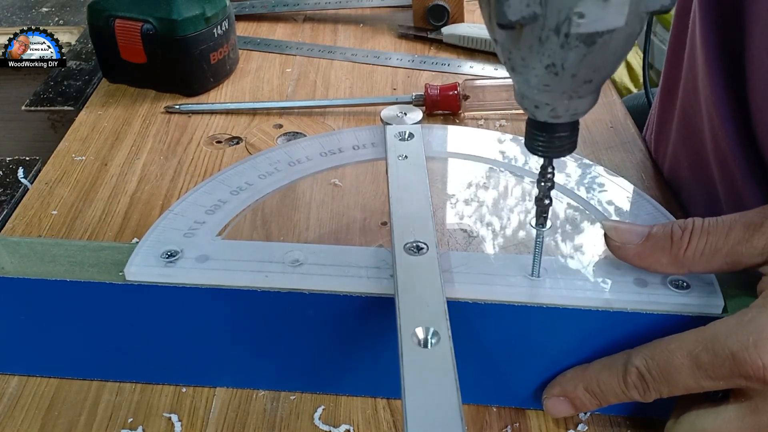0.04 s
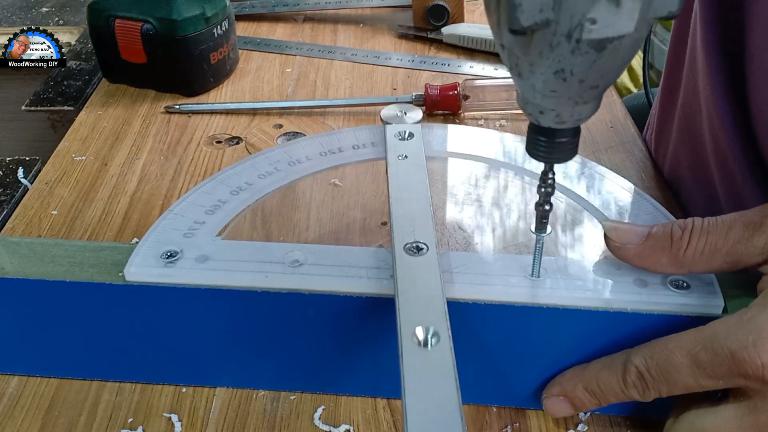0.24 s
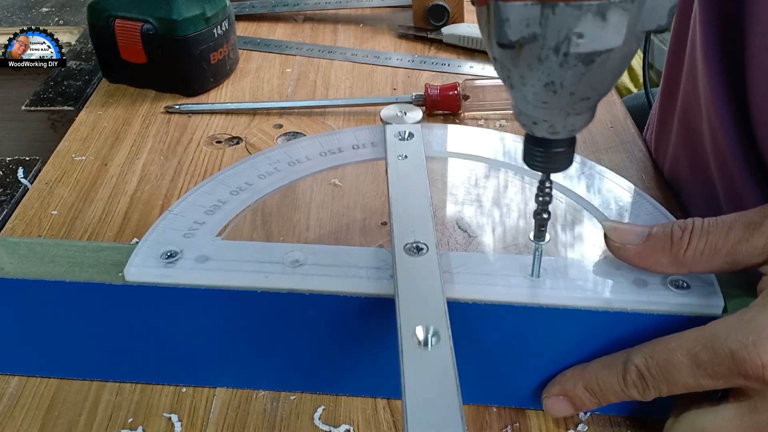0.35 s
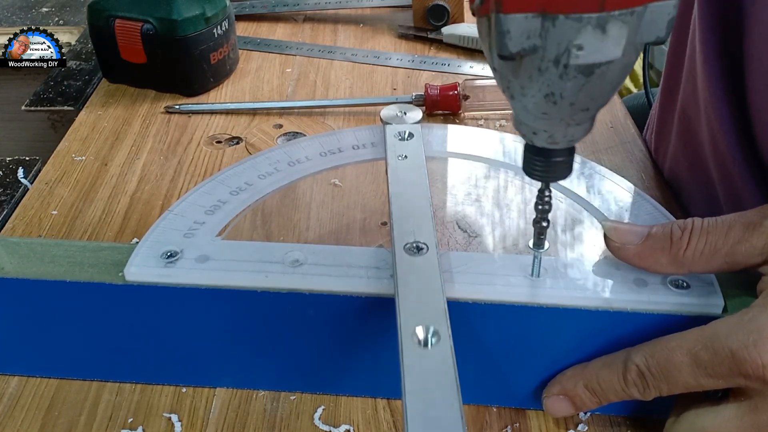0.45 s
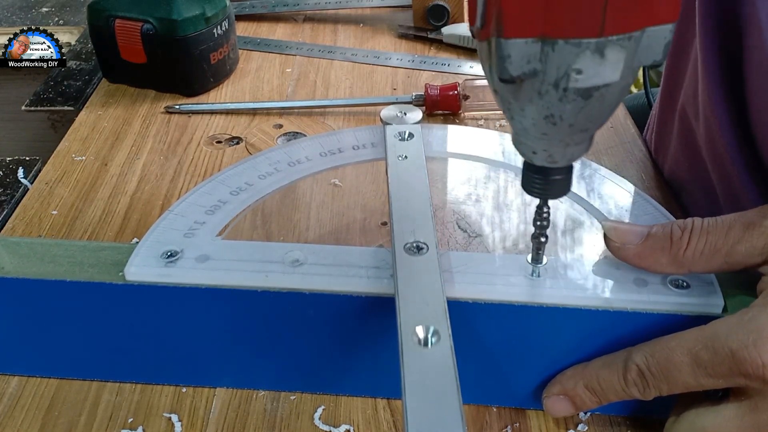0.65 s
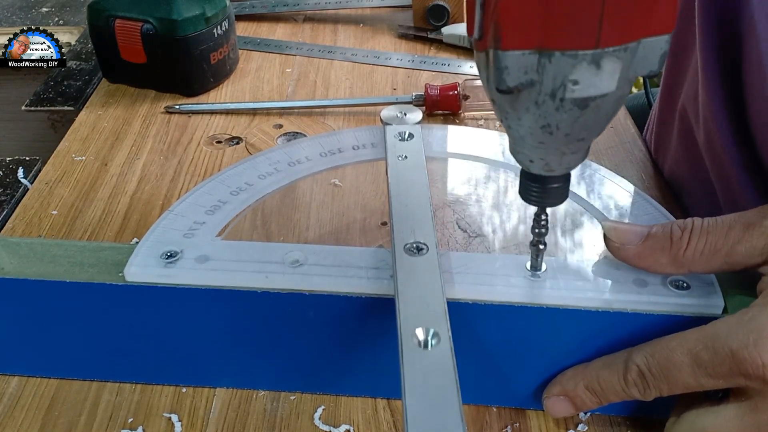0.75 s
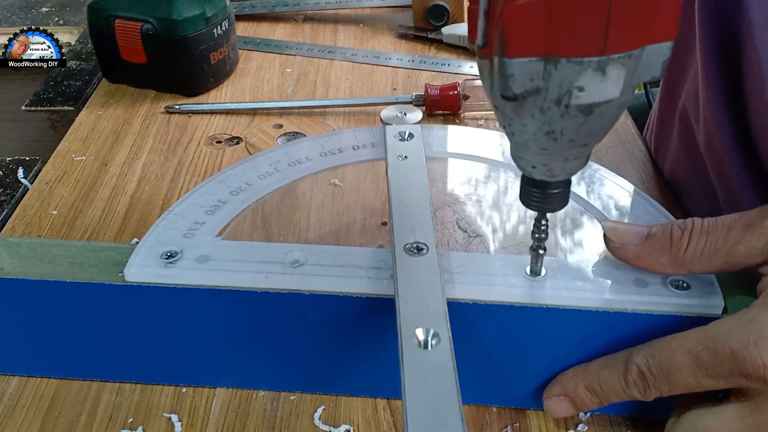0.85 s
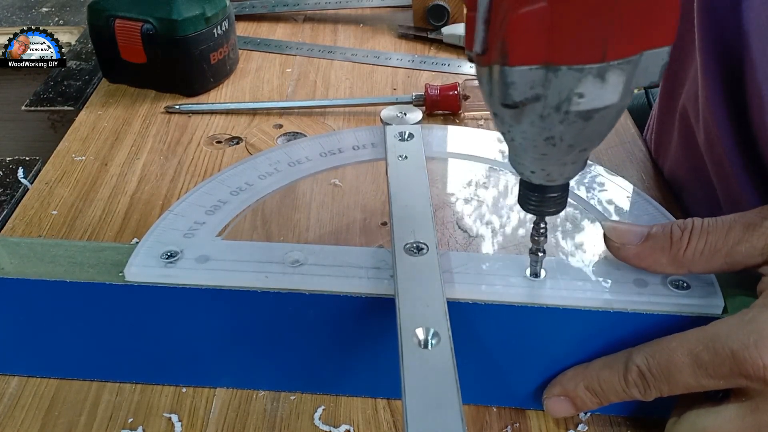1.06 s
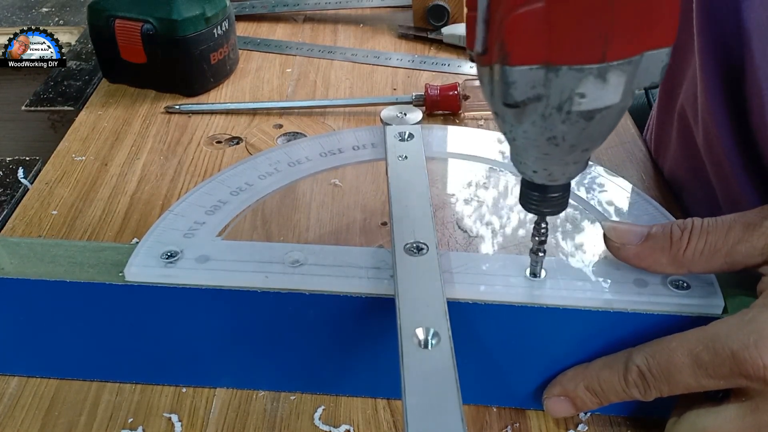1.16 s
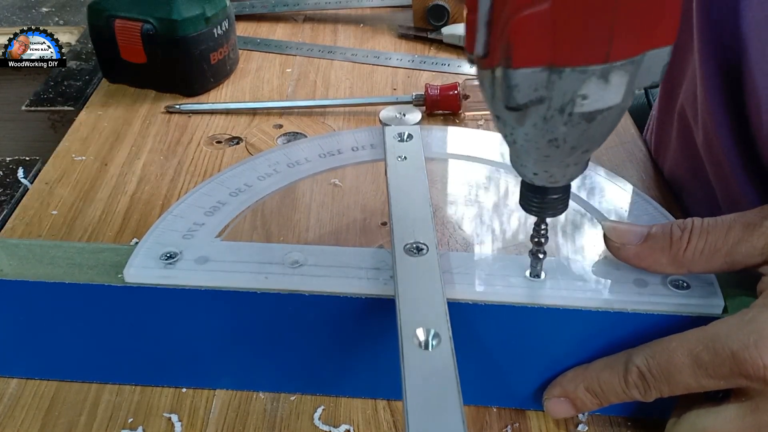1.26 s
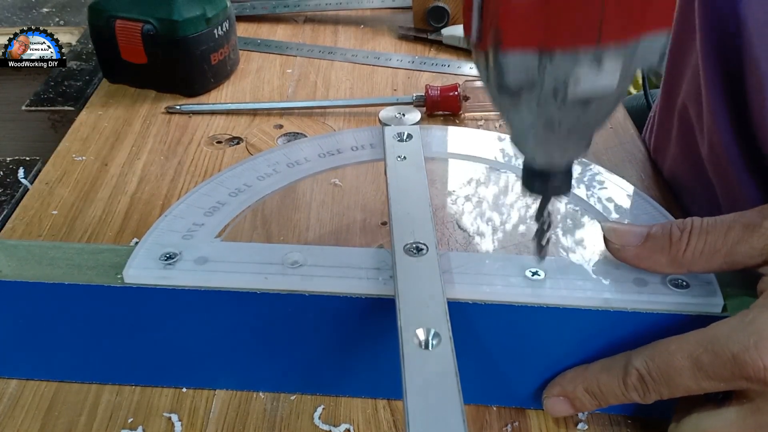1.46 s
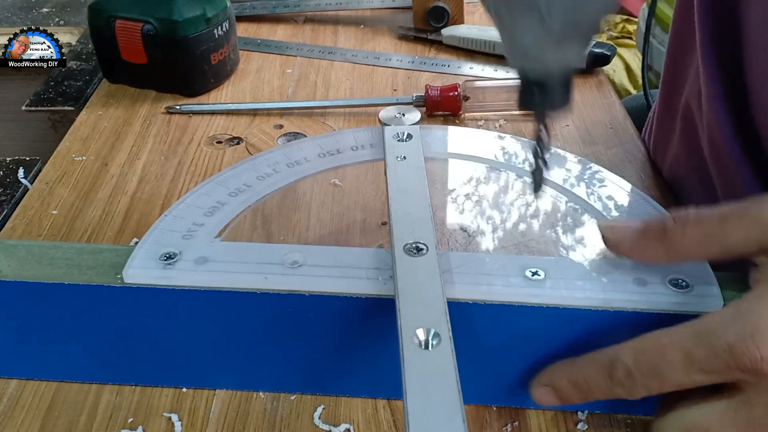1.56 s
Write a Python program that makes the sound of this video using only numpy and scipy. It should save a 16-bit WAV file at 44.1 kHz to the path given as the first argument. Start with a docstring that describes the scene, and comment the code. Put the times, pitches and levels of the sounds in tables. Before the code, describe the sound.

A cordless impact driver spins up close by with a rattling whine, slowing to a stall as a screw grinds into wood. A second, shorter burst hammers it tight with sharp knocks, over faint workshop background.

```python
"""Faint workshop background, then a cordless impact driver spins up close by, its gears rattling and whining.
It runs a screw through a plastic protractor, grinding into wood, and slows to a stall as the screw bites.
After a short nudge, a second burst seats the screw with hammer blows that thump the board,
while the tool's weight jolts the bench. The bit lifts off with a tick."""
import sys
import numpy as np
from scipy import signal
from scipy.fft import rfft, irfft
from scipy.io import wavfile

SR = 44100
rng = np.random.default_rng(int(sys.argv[2]) if len(sys.argv) > 2 else 0)


def transcribe(signal):
    """Save signal, clipped to [-1, 1], as a 16-bit WAV file at the path in sys.argv[1]."""
    frames = np.atleast_2d(signal).T
    limited = np.clip(frames, -1, 1)
    pcm = np.round(limited * 32767).astype(np.int16)
    wavfile.write(sys.argv[1], SR, pcm)


N = 70560
TIME_S = np.arange(N) / SR
BINS_HZ = np.fft.rfftfreq(N, 1 / SR)


def undb(db):
    """Decibels to gain."""
    return 10 ** (np.asarray(db) / 20)


def unit_rms(x):
    """Scale to rms 1."""
    return x / np.sqrt(np.mean(np.abs(x) ** 2))


def curve(rows):
    """Join (t/s, value) points linearly."""
    return np.interp(TIME_S, *np.array(rows).T)


def at_hz(rows, hz):
    """Read (f/Hz, value) points on a log-frequency axis."""
    points_hz, values = np.array(rows).T
    return np.interp(np.log(np.maximum(hz, 1)), np.log(points_hz), values)


def colour(x, rows):
    """Filter by (f/Hz, gain/dB) points."""
    return irfft(rfft(x) * undb(at_hz(rows, BINS_HZ)), N)


def treble(x, hz):
    """High-pass at hz."""
    return irfft(rfft(x) * (1 - 1 / (1 + (BINS_HZ / hz) ** 6)), N)


def wander(hz):
    """Smooth random signal, rms 1, bandwidth about hz."""
    return unit_rms(irfft(rfft(rng.standard_normal(N)) * np.exp(-(BINS_HZ / hz) ** 2), N))


# Stereo width: f/Hz, side minus mid/dB
WIDTH_DB = [(60, -11), (150, -20), (300, -30), (600, -3), (1200, -7), (2500, -2), (5000, 2), (14000, -1)]

def noise(rows):
    """Coloured stereo noise, rms 1: bass narrow, treble wide."""
    mid, side = rng.standard_normal((2, N))
    stereo = mid + colour(side, WIDTH_DB) * np.array([[1], [-1]])
    return unit_rms(colour(stereo, rows))


# Background spectrum: f/Hz, relative density/dB
BACKGROUND_SPECTRUM_DB = [(18, -56), (30, -26), (65, -11), (102, -5), (143, 1.5), (200, -7.5), (312, -6),
                          (552, -13), (837, -7), (978, -12.5), (2430, -9), (3320, -15), (5170, -10),
                          (8040, -33.5), (15000, -43)]
# Background envelope: t/s, level/dB
BACKGROUND_DB = [(0, -45.5), (.15, -46), (1.1, -51), (1.48, -51), (1.54, -53), (1.6, -69)]

def workshop_background():
    """Faint, low room noise."""
    return noise(BACKGROUND_SPECTRUM_DB) * undb(curve(BACKGROUND_DB))


# Motor speed: t/s, gear mesh f/Hz
MESH_HZ = [(.16, 119.1), (.19, 367.4), (.236, 872), (.265, 1245), (.3, 1376), (.34, 1511), (.42, 1579),
           (.48, 1543), (.56, 1523), (.66, 1484), (.742, 1435), (.78, 1231), (.82, 1047), (.86, 938),
           (.922, 887.6), (.96, 611.7), (1.0, 335), (1.03, 150), (1.13, 130.8), (1.17, 200), (1.22, 790),
           (1.3, 449.2), (1.4, 351.3), (1.47, 118.9)]

def motor():
    """Wavering drive: mesh rate, elapsed mesh cycles and the shaft's swing."""
    mesh_hz = curve(MESH_HZ) * (1 + 0.0039 * wander(29.45))
    mesh_cycles = np.cumsum(mesh_hz) / SR
    shaft = np.sin(2 * np.pi * mesh_cycles / 6.4)  # 6.4 mesh cycles a turn
    return mesh_hz, mesh_cycles, shaft


# Chatter spectrum: f/Hz, relative density/dB
RATTLE_SPECTRUM_DB = [(35, -65), (60, -37.5), (135, -20), (210, -17), (236, -13.5), (272, -22.5),
                      (368, -12), (657, -13.5), (889, -10), (1910, -4.5), (2200, 1), (3050, -8),
                      (3500, -12), (4630, -7.5), (5980, -7), (6560, -17), (9080, -18.5), (9970, -26),
                      (15500, -17)]
# Rattle envelope: t/s, level/dB
RATTLE_DB = [(.15, -58.5), (.18, -35.5), (.198, -24), (.222, -27.5), (.245, -23.5), (.4, -20), (.6, -19.5),
             (.78, -19), (.86, -23), (.95, -22.5), (.985, -26), (1.01, -49), (1.034, -39), (1.046, -27.5),
             (1.085, -43.5), (1.135, -66), (1.152, -45.5), (1.175, -41.5), (1.192, -19.5), (1.222, -27),
             (1.24, -20.5), (1.31, -22), (1.35, -26.5), (1.415, -32), (1.47, -62)]

def gear_rattle(mesh_hz, shaft, grain_db=2, grain_hz=634, hiss_hz=7000, hiss_db_per_octave=5):
    """Gears and brushes chatter in uneven grains, brighter with speed, over the shaft's hum."""
    speed = mesh_hz / 1530  # 1 at full speed
    grains = unit_rms(undb(grain_db * wander(grain_hz)) * (1 + 0.088 * shaft))
    chatter = noise(RATTLE_SPECTRUM_DB) * grains
    hiss_gain = undb(hiss_db_per_octave * np.log2(speed))
    chatter += treble(chatter, hiss_hz) * (hiss_gain - 1)
    hum = undb(-27) * shaft * speed * (1 + 0.66 * wander(20))
    return (chatter + hum) * undb(curve(RATTLE_DB))


# Board and bench modes: f/Hz, level/dB, t60/s
BOARD_MODES = [(138, -9.5, 0.056), (194, -13, 0.11), (329, -4.5, 0.13), (370, -1.5, 0.083),
               (439.5, -1.5, 0.066), (526, -7.5, 0.097), (630, -20, 0.029), (837, -9.5, .04)]

def board_thump(age_s, attack_s=0.0025):
    """The struck board rings in damped modes."""
    phases = rng.uniform(0, 2 * np.pi, len(BOARD_MODES))
    out = np.zeros(N)
    for (hz, db, t60_s), phase in zip(BOARD_MODES, phases):
        out += undb(db - 60 * age_s / t60_s) * np.sin(2 * np.pi * hz * age_s + phase)
    return out * (1 - np.exp(-age_s / attack_s))


# Metal crack spectrum: f/Hz, relative density/dB
BLOW_SPECTRUM_DB = [(200, -26), (800, -1.5), (1400, -7.5), (2000, 3), (2800, -1.5), (3700, -3),
                    (4500, -5.5), (5600, 0), (7200, -16), (10000, -26.5), (15000, -20)]
# Hammer, bit and screw head hits: t/s, relative level/dB, hold/s, treble/dB, relative thump/dB, ping f/Hz
METAL_BLOWS = [(.1687, -29, .0015, -1, -56, 2280), (.2316, -9.5, 0.0026, 0.5, -33.5, 1930),
               (.2595, -20, 0.0018, -3, -47, 2400), (1.0397, -24.5, 0.0014, 2, -43, 2436),
               (1.0550, -32, 0.0014, -1, -31, 2620), (1.184, -10, 0.0013, 0.5, -45, 2590),
               (1.1892, -17.5, 0.0005, -4.5, -32, 2870), (1.2297, -7, 0.0019, 0, -17, 1990),
               (1.2383, -22, 0.0012, -10, -40, 2510), (1.2575, -11.5, 0.00082, 4.5, -36, 2290),
               (1.2642, -15, 0.0031, 7.5, -22.5, 2707), (1.2885, -18.5, .003, 3, -32, 2675),
               (1.2968, -11, 0.0022, -3.5, -18.5, 2170), (1.3068, -15.5, 0.0026, 0, -27.5, 2750),
               (1.3615, -9.5, 0.0036, -5, -16, 2470), (1.3794, -14, 0.0014, -5, -27.5, 2640),
               (1.3934, -14, .0012, -12, -25, 1950), (1.4072, -14, 0.0017, -8, -28, 2150),
               (1.4206, -23.5, .001, -1.5, -41, 1930), (1.5078, -29, 0.0046, -6, -41, 2260)]

def metal_blows(attack_s=0.00041, crack_s=0.0019, ring_s=0.0089, ping_s=0.0013):
    """Each blow cracks, rings the struck metal briefly and excites the board."""
    metal = noise(BLOW_SPECTRUM_DB)
    top = treble(metal, hz=3924)
    lag_rad = 0.81 * np.array([[.5], [-.5]])
    out = np.zeros((2, N))
    for start_s, db, hold_s, treble_db, thump_db, ping_hz in METAL_BLOWS:
        age_s = np.maximum(TIME_S - start_s, 0)
        attack = np.minimum(age_s / attack_s, 1)
        crack = np.exp(-np.maximum(age_s - hold_s, 0) / crack_s)
        ring = undb(-14) * np.exp(-age_s / ring_s)
        burst = np.hypot(crack, ring) * (metal + (undb(treble_db) - 1) * top)
        ping = undb(8.5) * np.exp(-age_s / ping_s) * np.sin(2 * np.pi * ping_hz * age_s + lag_rad)
        out += undb(db - 1) * attack * (ping + burst)
        out += undb(thump_db + 1) * board_thump(age_s)
    return out


# Whine envelope, strongest under load: t/s, level/dB
WHINE_DB = [(.17, -60), (.2, -31), (.27, -34), (.42, -31), (.6, -26.5), (.7, -27), (.79, -21.5),
            (.85, -28.5), (.91, -24), (.98, -32), (1.02, -52), (1.17, -61), (1.22, -47), (1.38, -34),
            (1.45, -62)]
# Mesh harmonics: number, level/dB
HARMONICS_DB = [(1, 0), (2, 0), (3, -8.5), (4, -3), (5, -10.5), (6, -4)]
# Casing radiation: f/Hz, gain/dB
CASING_DB = [(150, -13), (420, 0.5), (650, -6.5), (900, -3), (1300, -7.5), (1550, -10), (1800, -2),
             (2300, -1), (2600, 3), (2950, 0), (3150, -3), (3600, -5.5), (4200, -4.5), (4650, 4.5),
             (5000, 6.5), (5400, 4), (5950, -1.5), (6700, -22.5), (9000, -22)]

def gear_whine(mesh_hz, mesh_cycles, shaft, roughness=0.6, rough_hz=80, twin_db=-5, detune=0.0098):
    """Meshing teeth sing in rough harmonics through the casing; a detuned twin makes them throb."""
    out = np.zeros((2, N))
    for harmonic, db in HARMONICS_DB:
        hz = harmonic * mesh_hz
        gain = undb(db + at_hz(CASING_DB, hz))
        phase = 2 * np.pi * harmonic * mesh_cycles
        pair = np.exp(1j * phase) + undb(twin_db) * np.exp(1j * phase * (1 + detune))
        lag_rad = np.arctan(undb(at_hz(WIDTH_DB, hz)))
        for channel, sign in enumerate((-1, 1)):
            flutter = 1 + roughness * (wander(rough_hz) + 1j * wander(rough_hz))
            out[channel] += gain * np.real(flutter * pair * np.exp(1j * sign * lag_rad))
    return out * (1 + 0.25 * shaft) * undb(curve(WHINE_DB))


# Grind spectrum: f/Hz, relative density/dB
GRIND_SPECTRUM_DB = [(50, -24), (130, -4.5), (240, -9), (350, -4.5), (480, -3), (700, -8.5), (1200, -9.5),
                     (2500, -53.5)]
# Grind envelope: t/s, level/dB
GRIND_DB = [(.18, -70), (.3, -34), (.9, -52), (1.03, -69), (1.052, -33), (1.09, -50), (1.18, -58),
            (1.235, -25), (1.32, -30), (1.39, -31), (1.44, -46), (1.48, -48)]

def screw_grind():
    """The screw grinds dully in the wood."""
    return noise(GRIND_SPECTRUM_DB) * undb(curve(GRIND_DB))


# Bench swings: t/s, relative level/dB, f/Hz, decay/s
BENCH_JOLTS = [(1.045, -32, 150, 0.016), (1.121, -44, 128, 0.024), (1.226, -20, 77.4, 0.0082),
               (1.257, -34, 134, 0.021)]

def bench_jolts(attack_s=0.0043):
    """The tool's weight jolts the bench into dull, quickly damped swings."""
    out = np.zeros(N)
    for start_s, db, hz, decay_s in BENCH_JOLTS:
        age_s = np.maximum(TIME_S - start_s, 0)
        envelope = np.exp(-age_s / decay_s) * (1 - np.exp(-age_s / attack_s))
        out += 2 * undb(db) * envelope * np.sin(2 * np.pi * hz * age_s)
    return out


def room(x, t60_s=0.19, build_s=0.014, wet_db=-13.5):
    """Add a short diffuse tail, different on each side."""
    age_s = TIME_S[:N // 3]
    envelope = undb(-60 * age_s / t60_s) * np.minimum(age_s / build_s, 1)
    tail = rng.standard_normal((2, len(age_s))) * envelope
    tail /= np.linalg.norm(tail, axis=1, keepdims=True)
    return x + undb(wet_db) * signal.fftconvolve(x, tail, axes=1)[:, :N]


# Stereo balance: f/Hz, left minus right/dB
BALANCE_DB = [(100, -1.5), (350, 0.5), (700, -1), (1400, -3), (2600, 4), (5000, -1), (14000, 2)]

def scene():
    """Driver, screw and bench in the room, over the background."""
    mesh_hz, mesh_cycles, shaft = motor()
    grind = screw_grind()
    gears = gear_whine(mesh_hz, mesh_cycles, shaft) + gear_rattle(mesh_hz, shaft)
    tool = room(gears + metal_blows() + grind + bench_jolts())
    channel_db = at_hz(BALANCE_DB, BINS_HZ) * np.array([[.5], [-.5]])
    return irfft(rfft(tool) * undb(channel_db), N) + workshop_background()


def record(dry, top_hz=15700):
    """Clip the hardest blows, then low-pass."""
    lowpass = signal.ellip(10, .2, 70, top_hz, fs=SR, output="sos")
    return signal.sosfilt(lowpass, np.clip(dry, -1, 1))


dry = scene()
out = record(dry)
transcribe(out)
```